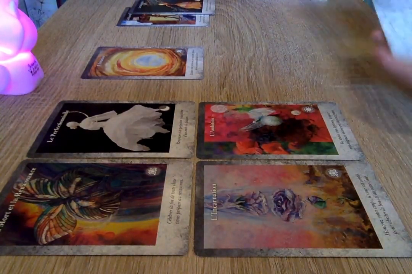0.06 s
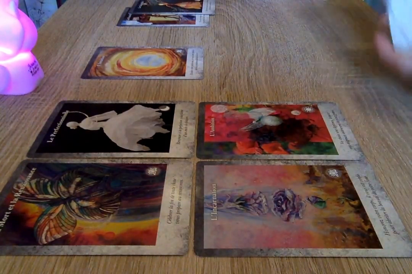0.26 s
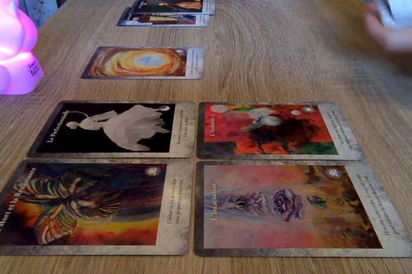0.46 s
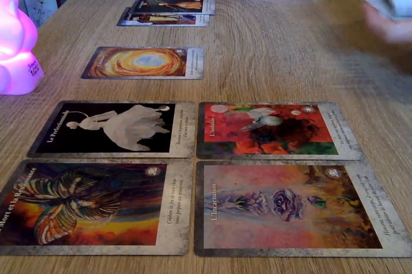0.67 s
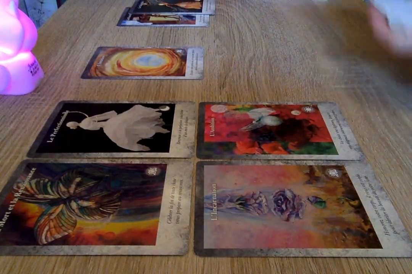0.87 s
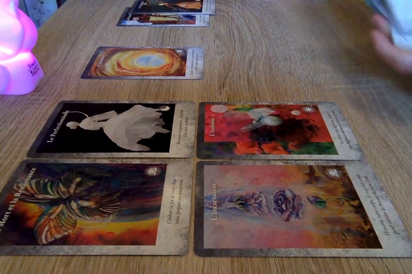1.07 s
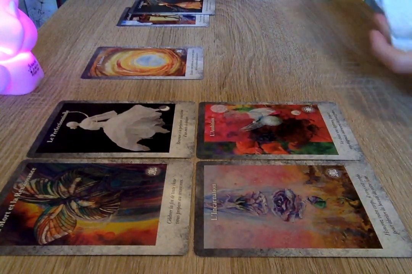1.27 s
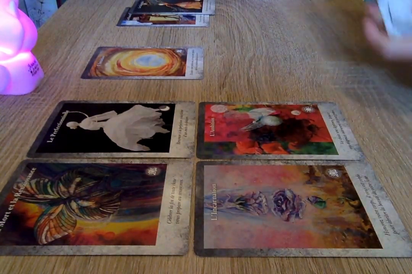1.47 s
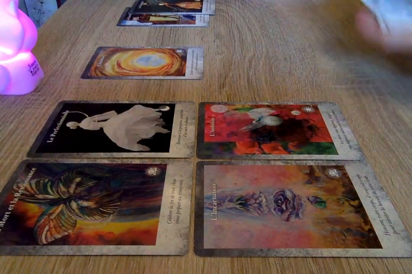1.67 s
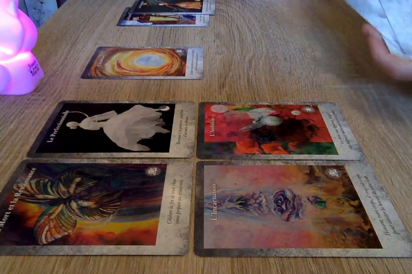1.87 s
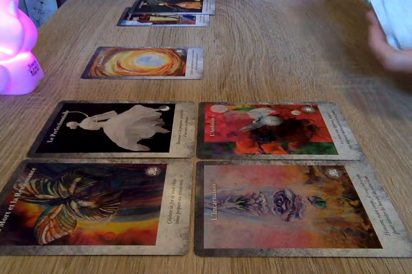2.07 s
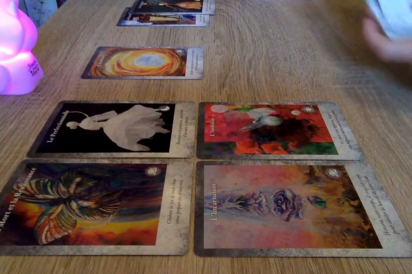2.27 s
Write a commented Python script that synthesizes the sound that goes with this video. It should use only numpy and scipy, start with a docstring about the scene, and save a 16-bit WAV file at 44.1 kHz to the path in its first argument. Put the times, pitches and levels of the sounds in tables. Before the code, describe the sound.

Overhand card shuffle close by: quick sliding swishes ending in snappy flicks, with one brief pause

```python
"""Packets of cards land in an overhand shuffle above a table, about four strokes a second, with one short pause.
Each landing is a burst of impacts, filtered into a soft thud, a papery slap and a clatter of edges.
Between landings, sliding friction gives a swelling hiss from the card faces and a lower, stuttering rub.
The table top returns one faint reflection, a small room rings briefly, and a quiet noise floor lies beneath."""
import sys
import numpy as np
from scipy import signal
from scipy.fft import rfft, irfft, next_fast_len
from scipy.io import wavfile
from scipy.ndimage import map_coordinates

SR = 44100
rng = np.random.default_rng(int(sys.argv[2]) if len(sys.argv) > 2 else 0)


def output_pcm(signal):
    """Save a mono or channel-first signal as 16-bit PCM at the path in sys.argv[1].

    Samples are clipped to [-1, 1] before scaling.
    """
    pcm = np.clip(np.atleast_2d(signal).T, -1, 1) * 32767
    wavfile.write(sys.argv[1], SR, np.round(pcm).astype(np.int16))


N = 102179
TIME = np.arange(N) / SR

# Colour of the background noise: f/Hz, spectral level/dB
FLOOR_COLOUR = [(25, -24), (160, -6.5), (400, -8), (900, -10.5), (2400, -10), (4000, -18.5), (8000, -23),
                (12000, -22), (16000, -34)]
# Reverberation time of the room: f/Hz, T60/s
ROOM_T60 = [(100, 0.27), (400, 0.19), (1000, 0.27), (2200, 0.26), (5000, 0.23), (9000, 0.21), (15000, 0.15)]
# Colour of the room's answer: f/Hz, level/dB
ROOM_COLOUR = [(60, -28.5), (200, -14.5), (500, -7.5), (1000, -4), (2500, -8), (5000, -4.5), (9000, -10.5),
               (15000, -6.5)]
# Cards sliding over each other: start t/s, speeding up t/s, slowing down t/s, swell/dB,
# hiss level/dB and rub level/dB (before trim and envelope), lowest hiss at the start f/Hz
SLIDES = [(0.0, 0.062, 0.014, 10.5, -34, -47, 4700), (0.217, .011, 0.0077, -1, -46, -49.5, 5970),
          (0.253, 0.032, 0.01, 14, -36.5, -44.5, 8950), (0.452, 0.0096, 0.011, 8, -43, -60.5, 6030),
          (0.497, .039, 0.0063, 22, -32.5, -51, 9000), (.694, 0.004, 0.018, 9, -51.5, -49, 6000),
          (0.748, 0.031, 0.013, 13, -30, -51, 10300), (0.939, 0.0051, 0.011, -9, -56, -54, 6000),
          (0.997, 0.033, 0.021, 2.5, -40.5, -58.5, 8900), (1.158, .015, 0.034, -5.5, -47, -48.5, 6000),
          (1.236, .053, 0.046, 10, -31.5, -45, 7900), (1.417, 0.019, 0.0067, 13, -36, -40.5, 6740),
          (1.708, 0.013, 0.014, -6, -41.5, -66, 7100), (1.737, 0.012, 0.027, -4, -47.5, -48, 4900),
          (1.787, .028, 0.034, 21, -30.5, -43.5, 4760), (1.962, 0.023, 0.012, 6.5, -37.5, -55.5, 7460),
          (2.052, 0.033, 0.023, 4.5, -34, -51.5, 5440), (2.222, .006, 0.015, 3, -42, -67, 5400),
          (2.28, 0.031, .013, 19, -36.5, -52, 6500)]
# Colours of the friction: f/Hz, spectral level/dB
HISS_COLOUR = [(1500, -17), (4000, 1), (5200, -2), (6500, -3), (8000, -1), (11000, 0), (14500, 2.5),
               (16000, -1.5)]
RUB_COLOUR = [(30, -25), (70, -15), (160, 3.5), (300, 2.5), (500, 0.5), (900, -1.5), (1400, -4),
              (2000, 2.5), (2900, -3.5), (3900, -11), (8000, -50)]
# Packets and single cards landing: t/s, length t/s, thud level/dB, slap level/dB, edge level/dB (before trim),
# slap pitch f/Hz, top of the slap f/Hz (higher when harder)
CONTACTS = [(0.041, 0.0065, -39.5, -41, -38, 720, 1800), (0.057, 0.001, -39, -54, -44, 600.0, 2800.0),
            (0.0634, 0.0037, -34.5, -33.5, -21, 2200, 4860), (0.066, 0.0013, -37, -30, -32, 2270, 2760),
            (0.2109, 0.0032, -43.5, -30.5, -31, 1700, 3780), (0.2148, 0.002, -49, -33.5, -36.5, 834, 2740),
            (0.245, 0.0076, -52, -37, -46, 615, 2930), (0.28, 0.011, -41, -42.5, -39, 610, 2400.0),
            (0.2971, 0.0041, -27, -26.5, -25, 716, 3700), (0.307, 0.0037, -40, -26.5, -26, 1830, 4600),
            (0.452, 0.0036, -53.5, -42.5, -45, 1500, 2230),
            (0.463, 0.0059, -55.5, -45.5, -42.5, 2200, 3020), (0.5476, 0.0037, -31, -29, -28, 2620, 4900),
            (0.555, 0.0088, -62, -26.5, -28, 2180, 4350), (0.6927, 0.0048, -41, -34.5, -41, 1500, 2200.0),
            (0.707, 0.003, -53, -36.5, -60, 1430, 3040), (0.715, 0.00071, -66, -48, -35.5, 2210.0, 3200.0),
            (0.775, 0.0016, -28, -28.5, -44, 620, 1770), (0.779, 0.011, -41, -33.5, -47, 1030, 2130),
            (0.7899, 0.0029, -32, -28, -29.5, 1450, 3550), (0.795, 0.0018, -40, -23.5, -24, 2070, 3630),
            (0.799, 0.003, -50, -27, -27.5, 1850, 3150), (0.9349, 0.0046, -48.5, -38, -33.5, 2270, 3300),
            (0.941, 0.0099, -49.5, -53, -46, 1160, 3800.0), (0.954, 0.001, -62, -38, -75, 1280, 3430),
            (1.034, 0.0077, -35.5, -27.5, -44, 1230, 2460), (1.044, 0.0088, -38.5, -35, -60, 1710, 3120),
            (1.127, 0.011, -49, -36.5, -49, 750, 2930), (1.14, 0.0083, -36.5, -37, -30.5, 1690, 2550),
            (1.15, 0.00037, -57, -23.5, -18, 1590, 2600.0), (1.153, 0.0039, -37.5, -55, -31, 1130.0, 2620),
            (1.2143, 0.00076, -43.5, -41.5, -37, 1810.0, 3000.0),
            (1.222, 0.0057, -53, -50, -52, 1550.0, 3200.0), (1.241, 0.0022, -57, -44, -44, 2040.0, 4100.0),
            (1.254, 0.0018, -73, -33, -32.5, 2200, 3830), (1.265, 0.0021, -43, -48, -41, 1890.0, 3800.0),
            (1.295, 0.0021, -40, -39, -50, 1160, 3100.0), (1.3312, 0.0027, -39.5, -31, -43, 2180, 3250),
            (1.409, 0.0056, -42.5, -37.5, -48, 790.0, 1800),
            (1.423, 0.00087, -72, -49, -38, 1890.0, 2800.0), (1.437, 0.011, -48, -43, -34, 2350, 4840),
            (1.4937, 0.00044, -41, -50.5, -34, 2430, 3100.0), (1.497, 0.0077, -47, -68, -47, 600.0, 1800),
            (1.727, 0.0036, -47, -31.5, -34, 634, 3840), (1.748, 0.0073, -45.5, -47, -50, 600.0, 3100.0),
            (1.784, 0.0058, -71, -31.5, -39, 1210, 2430), (1.823, 0.0039, -55, -62, -34, 760.0, 3100.0),
            (1.8444, 0.00092, -38, -23, -20, 2140, 3700), (1.857, 0.0024, -39, -38, -31, 720, 2320),
            (1.978, 0.0056, -49, -38, -39, 1270.0, 3120), (1.9852, 0.0027, -47, -28.5, -30.5, 2620, 3200),
            (2.0053, 0.00055, -57, -43, -29.5, 1950, 3600.0), (2.044, 0.0039, -72, -39, -41.5, 805, 2920),
            (2.056, 0.011, -49.5, -42, -36, 640, 3100.0), (2.0974, 0.0016, -37.5, -26.5, -26, 2200, 3170),
            (2.219, 0.0054, -44, -39.5, -36.5, 1810, 2740), (2.2389, 0.00081, -70, -47, -34, 1410, 2100.0),
            (2.241, 0.0061, -43, -62, -65, 600.0, 2100.0), (2.286, 0.007, -79, -42.5, -41, 1700, 2440),
            (2.311, 0.0055, -43.5, -45, -39, 1090.0, 2090)]
# Colours of the impacts: f/Hz, spectral level/dB
THUD_COLOUR = [(25, -42), (55, -25.5), (90, -8), (140, -1), (230, 3), (380, -0.5), (600, -7), (1200, -22),
               (4000, -55)]
SLAP_COLOUR = [(150, -16), (400, -1), (750, 0.5), (1250, -2.5), (2000, -3), (2800, -4), (3800, -7),
               (5500, -9.5), (16000, -30.5)]
EDGE_COLOUR = [(1000, -47), (3000, -14), (4200, -7.5), (5400, -1), (8000, 2), (11000, 0), (16000, 1.5)]

FLOOR_DB = -73
TOP_HZ, TOP_WIDTH_HZ = 15850, 50  # band limit of the whole sound
RIPPLE_DB = 1.1  # random unevenness of every colour
ROOM_DELAY_S, ROOM_BUILD_S, ROOM_STRETCHES = 0.0047, 0.0044, 10
TABLE_S, TABLE_DB = 0.0011, -19  # reflection from the table top

SLIDE_RISE_S, SLIDE_STOP_S = 0.0021, 0.0023  # time constants
SLIDE_SAG_DB = 7.5  # loss as the stroke slows
HISS_TRIM_DB, RUB_TRIM_DB = -1.5, 0
OVERLAP_HZ, HISS_SLOPE = 5240, 7.6  # lowest hiss at full overlap; steepness below it
STUTTER_DB, STUTTER_PER_S = 1.2, 260

ATTACK_S = 0.00021
THUD_DECAY_S, SLAP_DECAY_S, EDGE_DECAY_S = 0.0031, 0.0025, 0.00054  # amplitude time constants
THUD_TRIM_DB, SLAP_TRIM_DB, EDGE_TRIM_DB = -2.5, -2.5, -2.5
FIRST_TOUCH = 7.4  # height of the opening impulse, before a factor that lowers it in short contacts
THUD_TOP_HZ, THUD_REF_DB, THUD_DB_PER_OCTAVE = 500, -37.5, 13  # a softer thud is also duller
SLAP_PEAK_DB, SLAP_OCTAVES = 6, 0.21  # height and width of a packet's resonance
SLAP_TOP_SLOPE = 9.8  # steepness above the top of the slap
SLAP_LOW_SHARE, SLAP_LOW_SLOPE = 0.37, 1.48  # a slap thins out below this share of its pitch


def amp(db):
    """Level to amplitude: 20 dB is a factor of ten."""
    return 10 ** (np.asarray(db) / 20)


def unit(x):
    """Normalisation of power: scale to rms 1."""
    return x / np.sqrt(np.mean(x ** 2) + 1e-20)


def along(points, hz):
    """Logarithmic frequency scale: interpolate (f/Hz, value) points along it."""
    f, v = np.transpose(points)
    return np.interp(np.log(hz + 1), np.log(f + 1), v)


def skirt(ratio, slope):
    """Filter roll-off: loss in dB past an edge, where the ratio passes 1."""
    return -10 * np.log10(1 + ratio ** (2 * slope))


def coloured(x, points, extra_db=lambda hz: 0):
    """Minimum-phase filtering: a causal response from a level curve, slightly uneven at each use."""
    m = 2 * next_fast_len(len(x))
    hz = np.fft.rfftfreq(m, 1 / SR)
    position = np.log1p(hz / 400) * 11
    ripple = map_coordinates(rng.standard_normal(64), [position])
    level_db = along(points, hz) + RIPPLE_DB * ripple + extra_db(hz + 1)
    # folding the cepstrum onto positive times makes the filter causal
    cepstrum = irfft(np.log(amp(level_db) + 1e-4))
    cepstrum[1:m // 2] *= 2
    cepstrum[m // 2 + 1:] = 0
    return irfft(rfft(x, m) * np.exp(rfft(cepstrum)))[:len(x)]


def grains(size, rate, smooth):
    """Shot noise: tiny random snaps, rate a second, over a share of even noise."""
    snaps = (rng.random(size) < rate / SR) * rng.standard_normal(size)
    return unit(snaps) + smooth * rng.standard_normal(size)


def background():
    """Stationary noise: a steady random signal with a fixed spectrum."""
    return amp(FLOOR_DB) * unit(coloured(rng.standard_normal(N), FLOOR_COLOUR))


def room(x):
    """Diffuse reverberation: decaying noise tails, drawn afresh for each stretch of time."""
    out = np.zeros(N)
    stretches = np.linspace(0, TIME[-1], ROOM_STRETCHES)
    for middle in stretches:
        hz, t, z = signal.stft(rng.standard_normal(SR // 2), SR, nperseg=256)
        t60 = along(ROOM_T60, hz)[:, None]
        decay = amp(along(ROOM_COLOUR, hz)[:, None] - 60 * t / t60)
        energy_norm = np.sqrt(2 * np.log(1000) / (t60 * SR))
        tail = signal.istft(z * decay * energy_norm, SR, nperseg=256)[1]
        since_delay = np.maximum(TIME[:len(tail)] - ROOM_DELAY_S, 0)
        tail = tail * (1 - np.exp(-since_delay / ROOM_BUILD_S))
        within = abs(TIME - middle) < stretches[1] / 2
        out += signal.fftconvolve(x * within, tail)[:N]
    return out


def table_bounce(cards):
    """Specular reflection: the table top returns a delayed, weaker copy."""
    return amp(TABLE_DB) * np.pad(cards, (round(TABLE_S * SR), 0))[:N]


def opening(x, start_hz, length):
    """Time-varying high-pass: its edge glides to one common value as the cards come to overlap."""
    hz, t, z = signal.stft(x, SR, nperseg=128)
    edge = np.interp(t, [0, length], [start_hz, OVERLAP_HZ])
    gain = 1 / np.sqrt(1 + (edge / (hz[:, None] + 1)) ** (2 * HISS_SLOPE))
    return signal.istft(z * gain, SR, nperseg=128)[1][:len(x)]


def stutter(t):
    """Amplitude modulation: uneven grip makes the friction flutter."""
    knots = rng.standard_normal(int(t[-1] * STUTTER_PER_S) + 2)
    return amp(STUTTER_DB * map_coordinates(knots, [t * STUTTER_PER_S]))


def slides():
    """Sliding friction: the level follows the stroke; faces hiss and flexing cards rub lower down."""
    out = np.zeros(N + SR)
    t = TIME[:SR // 4]
    for start, speeding, slowing, swell_db, hiss_db, rub_db, start_hz in SLIDES:
        stop = speeding + slowing
        speed = amp(np.interp(t, [0, speeding, stop], [-swell_db, 0, -SLIDE_SAG_DB]))
        speed = speed * (1 - np.exp(-t / SLIDE_RISE_S))
        speed = speed * np.exp(-np.maximum(t - stop, 0) / SLIDE_STOP_S)
        faces = coloured(grains(len(t), rate=5000, smooth=0.94), HISS_COLOUR)
        hiss = amp(hiss_db + HISS_TRIM_DB) * unit(opening(faces, start_hz, stop))
        flexing = coloured(grains(len(t), rate=450, smooth=0.63), RUB_COLOUR)
        rub = amp(rub_db + RUB_TRIM_DB) * unit(flexing)
        out[round(start * SR):][:len(t)] += speed * stutter(t) * (hiss + rub)
    return out[:N]


def cushion(thud_db):
    """Contact softness: the hand muffles a soft landing more than a hard one (dB)."""
    top_hz = THUD_TOP_HZ * 2 ** ((thud_db - THUD_REF_DB) / THUD_DB_PER_OCTAVE)
    return lambda hz: skirt(hz / top_hz, 2.03)


def packet(pitch_hz, top_hz):
    """Damped resonance: one broad peak, thin far below it and falling steeply past its top (dB)."""
    def level_db(hz):
        octaves = np.log2(hz / pitch_hz)
        peak = SLAP_PEAK_DB * np.exp(-0.5 * (octaves / SLAP_OCTAVES) ** 2)
        above = skirt(hz / top_hz, SLAP_TOP_SLOPE)
        below = skirt(SLAP_LOW_SHARE * pitch_hz / hz, SLAP_LOW_SLOPE)
        return peak + above + below
    return level_db


def contact(length, decay, colour, rate, smooth, extra_db=lambda hz: 0):
    """Repeated impact: a first touch, then a dying burst; its energy is that of rms 1 over length + decay."""
    t = TIME[:SR // 16]
    shape = (1 - np.exp(-t / ATTACK_S)) * np.exp(-np.maximum(t - length, 0) / decay)
    impacts = shape * grains(len(t), rate, smooth)
    touch = FIRST_TOUCH * np.sqrt(length / (length + ATTACK_S))
    impacts[round(ATTACK_S * SR)] += touch * rng.choice([-1, 1])
    burst = coloured(impacts, colour, extra_db)
    return burst * np.sqrt((length + decay) * SR / np.sum(burst ** 2))


def landings():
    """Superposed impacts: a packet thuds into the hand, slaps face on face and clatters with its edges."""
    out = np.zeros(N + SR)
    for start, length, thud_db, slap_db, edge_db, pitch_hz, top_hz in CONTACTS:
        thud = contact(length, THUD_DECAY_S, THUD_COLOUR, rate=2500, smooth=0.42, extra_db=cushion(thud_db))
        slap = contact(length, SLAP_DECAY_S, SLAP_COLOUR, rate=3000, smooth=0.33,
                       extra_db=packet(pitch_hz, top_hz))
        edge = contact(length, EDGE_DECAY_S, EDGE_COLOUR, rate=5600, smooth=2.2)
        landing = amp(thud_db + THUD_TRIM_DB) * thud
        landing += amp(slap_db + SLAP_TRIM_DB) * slap
        landing += amp(edge_db + EDGE_TRIM_DB) * edge
        out[round(start * SR):][:len(landing)] += landing
    return out[:N]


def scene():
    """Superposition: cards, table reflection, room and background add linearly."""
    cards = landings() + slides()
    return (cards + table_bounce(cards) + room(cards) + background())[None]


def record(dry):
    """Band limitation: a steep low-pass removes the highest treble."""
    m = next_fast_len(N + SR // 2)
    hz = np.fft.rfftfreq(m, 1 / SR)
    gain = 0.5 * (1 - np.tanh((hz - TOP_HZ) / TOP_WIDTH_HZ))
    return irfft(rfft(dry, m) * gain, m)[..., :N]


dry = scene()
out = record(dry)
output_pcm(out)
```